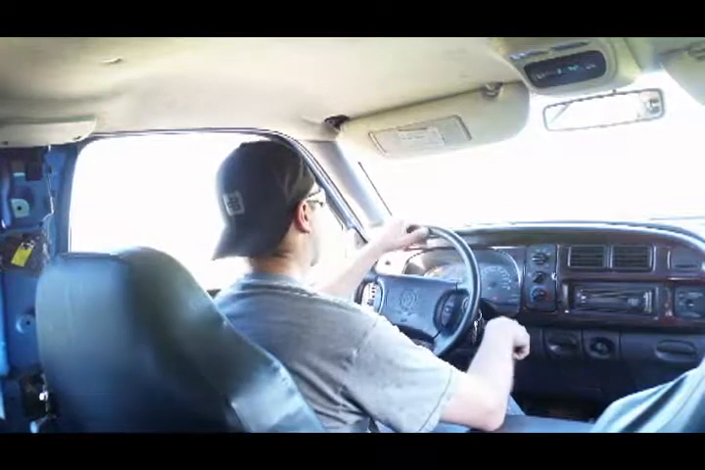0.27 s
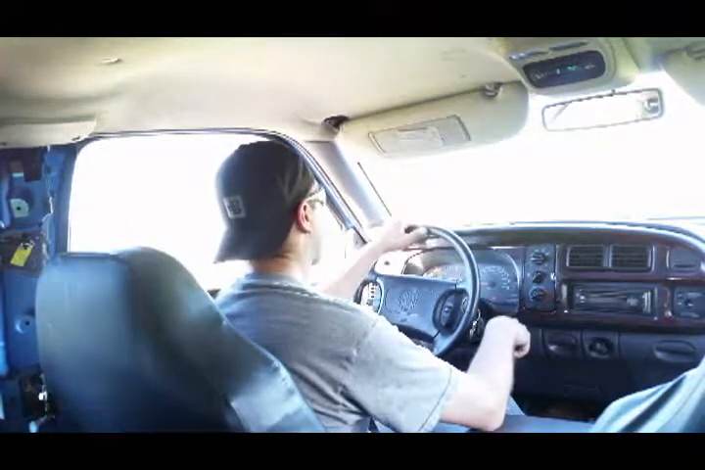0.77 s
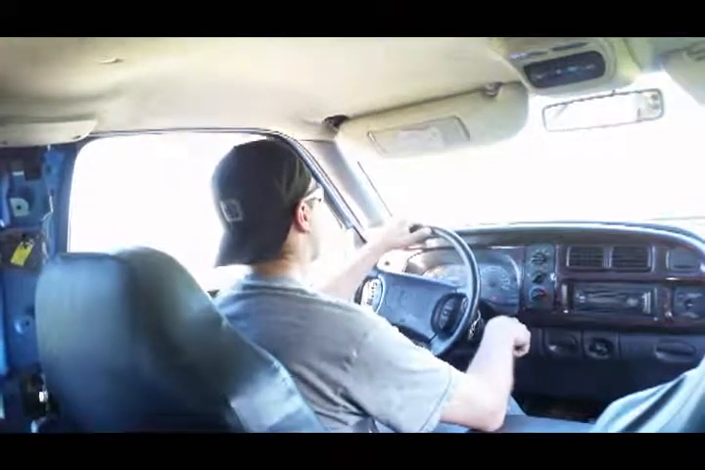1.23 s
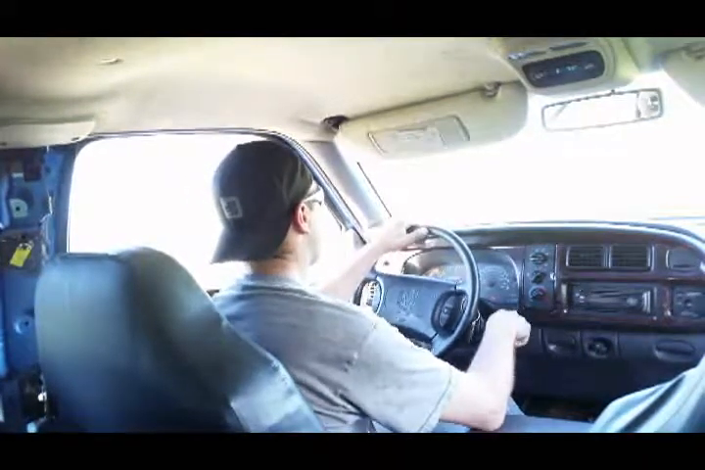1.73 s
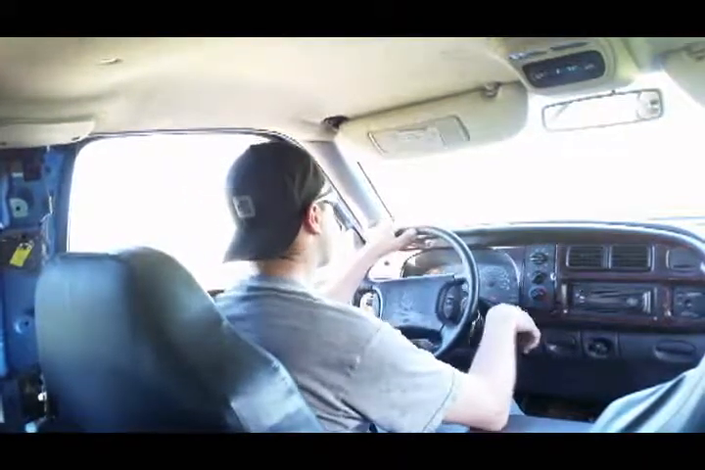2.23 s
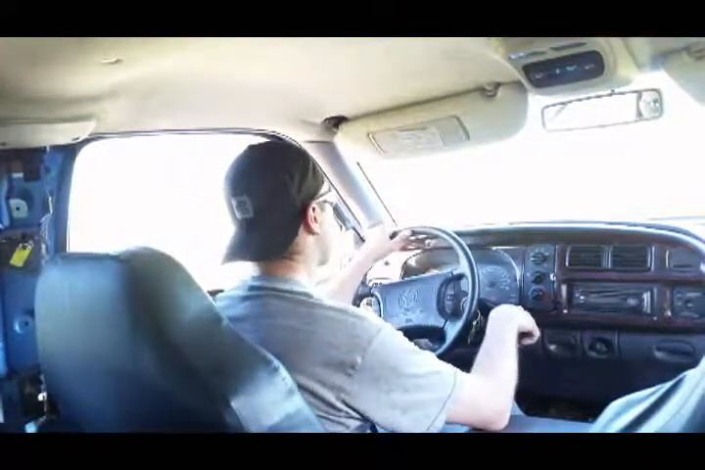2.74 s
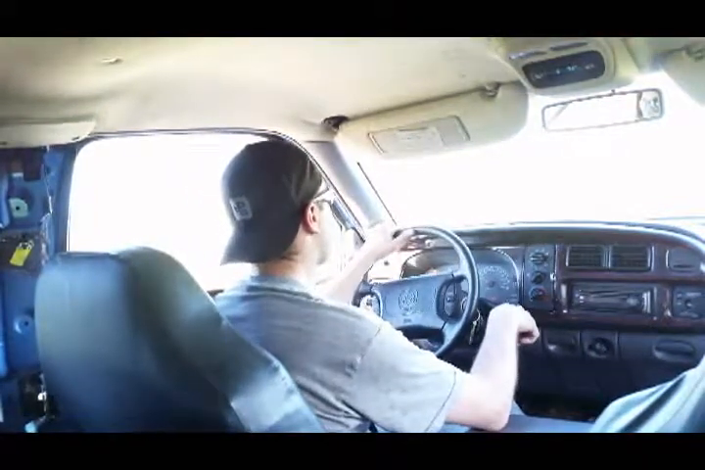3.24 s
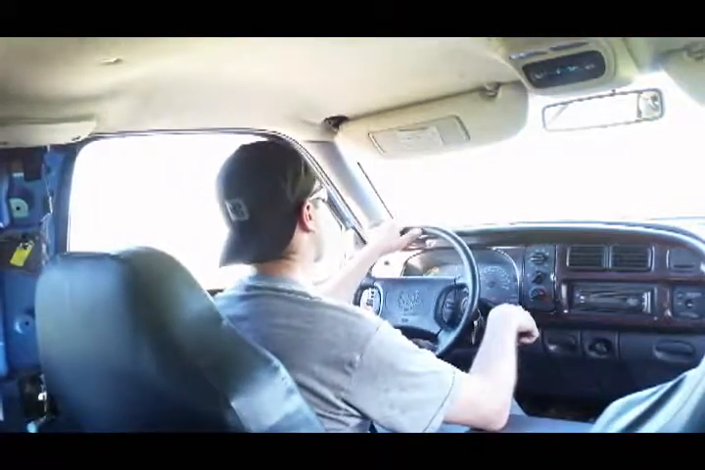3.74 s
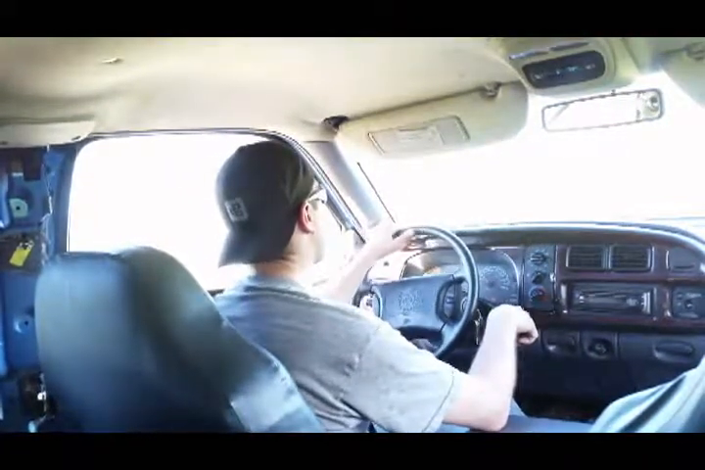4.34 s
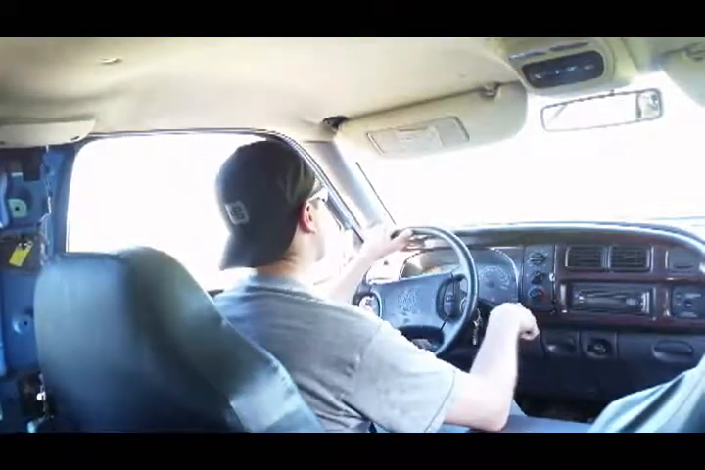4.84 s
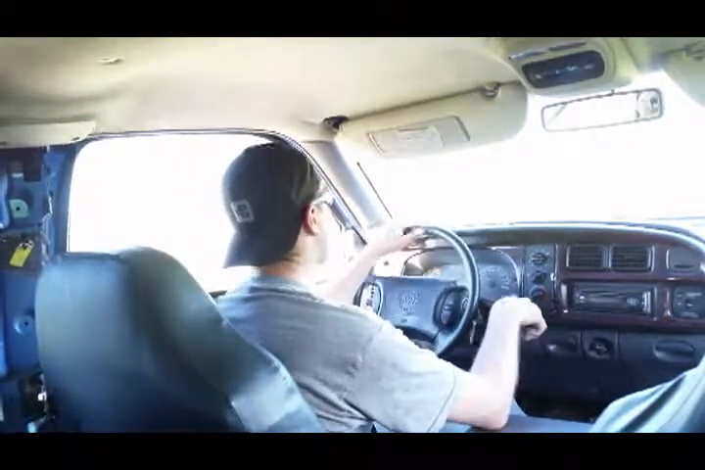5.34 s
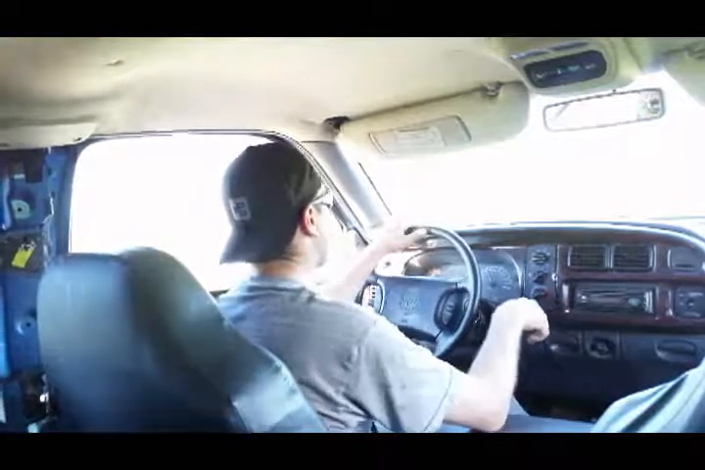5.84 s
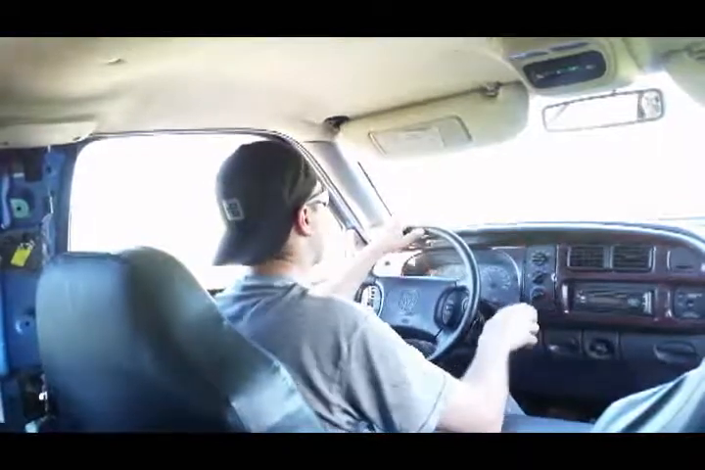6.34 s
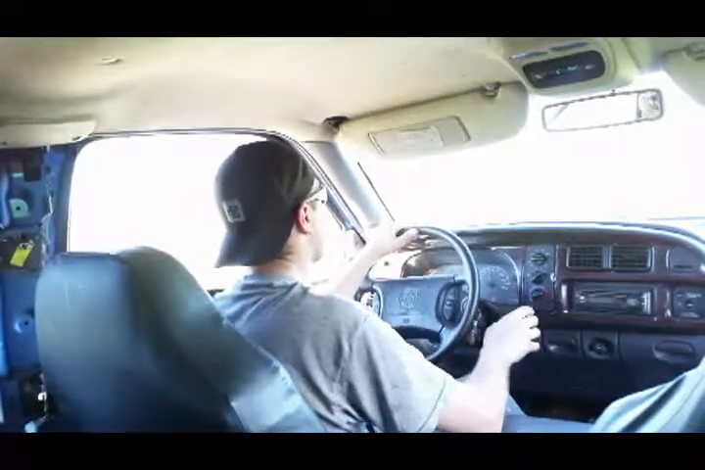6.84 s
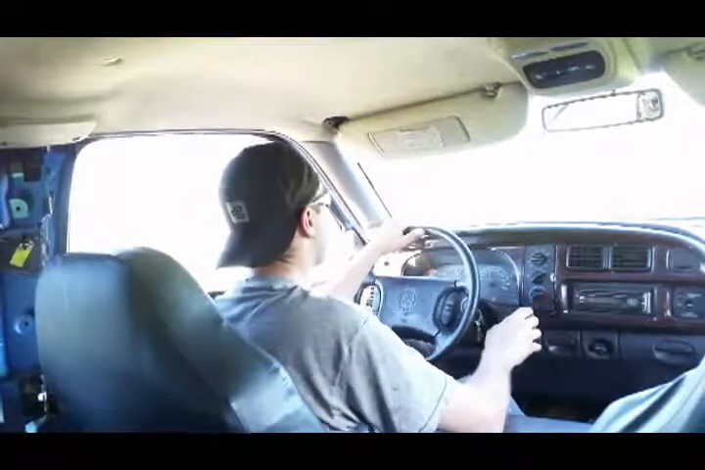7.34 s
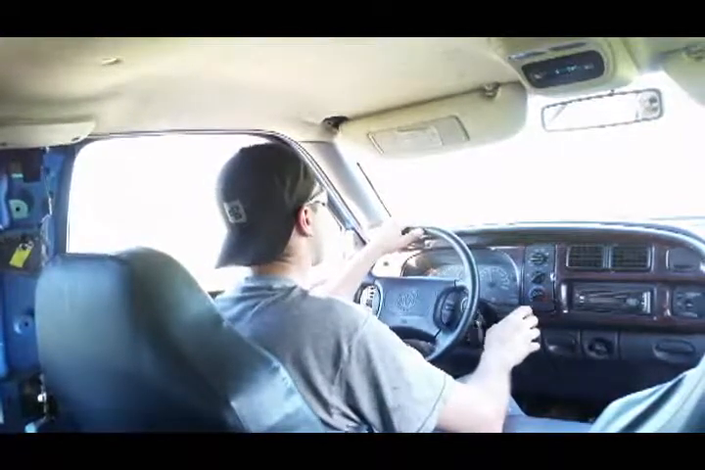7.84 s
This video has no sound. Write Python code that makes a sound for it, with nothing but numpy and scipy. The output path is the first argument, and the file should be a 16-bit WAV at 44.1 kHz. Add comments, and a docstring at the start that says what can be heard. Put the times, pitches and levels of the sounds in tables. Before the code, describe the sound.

A turbodiesel pickup engine booms through two upshifts, heard inside the cab with a thin turbo whistle and tyre rumble.

```python
"""A deep exhaust boom fills the cab of a six-cylinder turbodiesel pickup pulling hard through two
upshifts, heard from inside on a pair of microphones behind the seats. Even firings make the boom,
which dips as fuel is cut for each shift and surges as the gear catches. Unequal cylinders shake the
body and growl, and the turbocharger whistles. Close around the microphones the panels buzz;
underneath are the rumble of the tyres and a hiss of intake air and wind."""
import sys
import numpy as np
from scipy import signal
from scipy.fft import rfft, irfft, next_fast_len
from scipy.io import wavfile

SR = 44100
rng = np.random.default_rng(int(sys.argv[2]) if len(sys.argv) > 2 else 0)


def generate_wav(signal):
    """Clip the signal to [-1, 1] and save it as 16-bit WAV at the path in sys.argv[1]."""
    frames = np.transpose(np.atleast_2d(signal))
    scaled = np.clip(frames, -1, 1) * 32767
    pcm = np.round(scaled).astype(np.int16)
    wavfile.write(sys.argv[1], SR, pcm)


N = 357210

# The engine's pull. Each row: time in seconds, four-stroke cycles per second, then relative levels
# in dB of the firing tone's octave, the shake and the growl.
ENGINE_RUN = [(0.0, 19.1, 0, 7, 4), (0.18, 20.9, 0, 1, -0.5), (0.36, 22.6, 2.5, 6.5, -2),
              (0.63, 24, 0.5, 1, 2.5), (1.04, 24.5, -4, 0.5, 1), (1.53, 24.2, -4, 3.5, 1.5),
              (2.08, 25.3, 0.5, 1, 2), (2.3, 22.95, 1.5, 0.5, -1.5), (3.88, 24.28, 2.5, 1.5, 2.5),
              (5.21, 25.7, 0.5, 3.5, 1.5), (5.35, 27, -1, 2.5, 2), (5.6, 25.5, -0.5, 2, 0),
              (5.86, 23.2, 3.5, 4, 0), (6.0, 20.7, -2, 1.5, -2), (6.17, 18.3, -2, -4, -1),
              (6.9, 19.8, -1, 3, 3.5), (7.56, 20.76, 1, -3, -2), (8.1, 21.8, 3, 2, 0.5)]
# From the tailpipe to the microphones. Each row: frequency in Hz, left and right gain in dB,
# phase lead of the left in radians.
TAILPIPE_TO_MICS = [(113.5, -11.5, -19, 1), (116.4, -24.5, -6.5, 1.6), (120.5, -11.5, -11, 1.7),
                    (124.2, -6.5, -11, 0.24), (128.3, -8.5, -15, -1.35), (130, -10, -7, -0.5),
                    (139.1, -9, -11.5, 0), (144.94, -9, -16.5, 1), (147.94, -14, -17, 3.0),
                    (153, -14, -27.5, 4), (156, -17.5, -18, 2.0), (221, -17.5, -42.5, 2),
                    (234.4, -20.5, -20, 7.5), (239.5, -19.5, -21, 7), (272.7, -15.5, -23, 7),
                    (278.8, -22, -25, 6.5), (283.4, -20.5, -22, 7), (307.5, -19, -22, 7.0),
                    (323, -16.5, -19, 9.5)]
# Fuel cuts. Each row: start and end in seconds, change in dB of the firing tone and of its octave.
UPSHIFTS = [(2.085, 2.247, -11, -1.5), (5.29, 5.683, 0.5, -3)]
# Unequal cylinders. Each entry: relative level in dB of the line at 2, 3, 4 .. times the cycle rate.
BLOCK_ORDERS_DB = [2.5, 7, 5.5, 5, -12.5, 4, 1.5, 8, -2, -6, -17, -5, 4, -4.5, -1.5, -9, 4.5, -7.5, 0.5, -9,
                   -1.5, -7.5, -2.5, -8, 1, -9, 0.5, -10, 5, -7, 5, -5.5, 2.5, -0.5, 2, -3.5, 10, -1.5, 3.5,
                   -4, -0.5, -8.5, 5.5, -1]
# Through mounts and panels to the microphones. Each row: frequency in Hz, left and right gain in dB,
# phase lead of the left in radians.
BODY_TO_MICS = [(45.0, -36, -37.5, 0.7), (62.3, -41, -36, 1.6), (75.6, -29.5, -27, 0.4),
                (98, -40, -37, 0.5), (113.7, -30, -29, 2.6), (127, -24, -21, 1.98),
                (150.0, -32.5, -25.5, 2), (165, -31.5, -45, -2.3), (178, -33.5, -37, -1.2),
                (204, -36, -37, -1.6), (256, -36, -34.5, -0.65), (271, -32.5, -29.5, 0.1),
                (325, -43, -39, 1.2), (338, -34, -37, 1), (382, -38.5, -38.5, 1.1), (420, -42, -41.5, -0.8),
                (482, -39, -36, -1.5), (515, -46, -42.5, -0.6), (540, -42, -38.5, -0.6),
                (564, -49.5, -42, -0.4), (603, -41.5, -47, 1), (638, -47, -45, 1.6), (685, -48, -48, 1.5),
                (738, -53, -47, 3.5), (752, -57, -43.5, 4.5), (822, -57, -55, 4), (866, -60, -56.5, 5.5),
                (936, -62, -63.5, 2.0), (1040, -58.5, -59.5, 2.5)]
# The turbocharger spooling up. Each row: time in seconds, shaft turns per second, then relative
# levels in dB of the whine and of its third and fourth harmonics together.
TURBO_RUN = [(0, 1890, -57, -55), (.12, 2050, -54, -51), (.27, 2270, -55.5, -70), (.45, 2450, -70, -79),
             (1.1, 2450, -66, -78), (1.25, 2460, -56, -76), (1.9, 2400, -55, -70), (2.1, 2310, -53, -67),
             (2.3, 2310, -55, -66), (2.6, 2450, -60.5, -75), (3.4, 2550, -58, -74), (4.4, 2610, -57, -68),
             (5.0, 2585, -61, -70), (6.0, 2620, -60, -70), (6.6, 2745, -60, -64), (7.2, 2805, -57, -66),
             (7.5, 2815, -66, -80), (8.1, 2845, -65, -71)]
# Tyre rumble as the cab colours it. Each row: frequency in Hz, relative left and right density in dB,
# likeness of the sides from -1 to 1.
TYRE_SPECTRUM = [(20, -17, -25, .9), (35, -13.5, -13, 1), (60.3, -8, -7.5, 0.91), (74, 4, 6, 0.95),
                 (97, -3.5, 0, 1), (124, -3, -0.5, 1), (163, -4, -4.5, 0.98), (205, -9.5, -12.5, 1),
                 (338, -8.5, -11.5, 0.35), (450, -19, -16.5, 0.56), (676, -23.5, -21.5, 0.37),
                 (876, -27, -28, -0.042), (1086, -34.5, -36, -0.8), (1620, -57.5, -46, -0.021)]
# Dash and door resonances. Each row: frequency and width in Hz, relative left and right level in dB,
# likeness of the sides from -1 to 1.
PANEL_MODES = [(890, 98, -1, 1, -0.33), (1126, 95, -3, -6, -0.65), (1408, 180, -4, -3, -0.18)]
# Intake and wind hiss. Each row: frequency in Hz, relative left and right density in dB.
HISS_SPECTRUM = [(900, -74, -79.5), (1700, -79, -78), (2320, -80, -74), (2900, -80, -77.5),
                 (3300, -86, -79), (4330, -87.5, -78.5), (4900, -90.5, -77), (5520, -101, -80.5),
                 (6230, -99, -95), (6660, -114, -83), (8000, -93, -84.5), (10000, -88.5, -84.5),
                 (11200, -79, -92), (11660, -79, -97), (12400, -75.5, -93), (13200, -75.5, -90.5),
                 (14700, -78.5, -85), (15800, -75.5, -79.5)]
# The background, set lower where the exhaust booms. Each row: time in seconds, relative hiss level
# in dB, tyre rumble level in dB.
BACKGROUND_LEVELS = [(0.03, -44.5, -15.5), (0.27, -54.5, -25), (0.48, -52.5, -27), (0.85, -49.5, -24.5),
                     (1.2, -51, -26.5), (2.05, -46, -19), (2.22, -47, -17), (2.4, -51, -24.5),
                     (2.7, -51, -22.5), (3.2, -51, -26), (3.96, -48, -21.5), (4.8, -48.5, -23.5),
                     (5.45, -46, -17), (5.68, -46.5, -18), (5.93, -52, -22), (6.1, -50.5, -20),
                     (6.8, -49.5, -21.5), (7.55, -53, -26), (8.05, -51, -24)]


def exhaust(cycle, octave_db, firing_db=-0.05):
    """Six even firings a cycle leave the tailpipe as two clean tones that boom in the cab."""
    firing_shift_db, octave_shift_db = fuel_cut()
    firing = from_db(firing_db + firing_shift_db + 1.46 * drift(6)) * np.sin(6 * cycle)
    octave = from_db(octave_db + octave_shift_db + 0.88 * drift(3.4)) * np.sin(12 * cycle + 1.3)
    return to_microphones(np.sqrt(2) * (firing + octave), TAILPIPE_TO_MICS)


def fuel_cut(catch_s=0.02, surge_db=2.5, settle_s=0.11):
    """Change in dB of the two exhaust tones: fuel is cut for a shift, then they overshoot and settle."""
    t = np.arange(N) / SR
    change_db = 0
    for start, end, *cut_db in UPSHIFTS:
        cut = np.clip(np.minimum(t - start, end - t) / catch_s, 0, 1)
        surge = np.clip((t - end) / catch_s + 1, 0, 1) * np.exp(-np.abs(t - end) / settle_s)
        change_db = change_db + np.outer(cut_db, cut) + surge_db * surge
    return change_db


def engine_block(cycle, shake_db, growl_db, waver_db=2.0, waver_rad=0.13):
    """No two cylinders burn alike, nor two cycles: wavering lines, the lowest a shake, the rest a growl."""
    wander = [drift(4.64) for _ in range(7)]
    lines = 0
    for k, level_db in enumerate(BLOCK_ORDERS_DB):
        order = k + 2
        phase = order * cycle + rng.uniform(0, 2 * np.pi) + waver_rad * wander[k % 7]
        layer_db = shake_db if order < 6 else growl_db   # the shake lies below the firing tone
        gain = from_db(layer_db + level_db + waver_db * wander[(3 * k + 1) % 7])
        lines = lines + gain * np.sin(phase)
    return to_microphones(np.sqrt(2) * lines, BODY_TO_MICS)


def turbocharger(blades=7, fade_db_per_hz=0.0035):
    """Faint thin shaft lines, and a blade whistle smeared wide by turbulent intake air."""
    shaft_hz, whine_db, harmonics_db = in_time(TURBO_RUN)
    shaft = phase_of(shaft_hz)
    first = smeared_line(shaft, width_hz=40, sides_db=(1, 4))
    second = smeared_line(2 * shaft, width_hz=25, sides_db=(-14, -2))
    third = smeared_line(3 * shaft, width_hz=20, sides_db=(-5, 5))
    fourth = smeared_line(4 * shaft, width_hz=25, sides_db=(-3, 5))
    whistle = smeared_line(blades * shaft, width_hz=350, sides_db=(2.5, -3))
    fourth_db = -1 + 0.02 * np.minimum(4 * shaft_hz - 9300, 0)   # grows until its pitch reaches 9300 Hz
    climb_hz = blades * (shaft_hz - shaft_hz[0])
    whistle_db = np.maximum(-25 - fade_db_per_hz * climb_hz, -42)   # fades to a floor as it climbs
    whine = from_db(whine_db + 2.8 * drift(3)) * (first + second)
    harmonics = from_db(harmonics_db) * (third + from_db(fourth_db) * fourth)
    return whine + harmonics + from_db(whistle_db) * whistle


def tyre_rumble(level_db):
    """Tyres on the road below the cab: low noise with a wavering level."""
    return from_db(level_db + 1.76 * drift(5.7)) * stereo_noise(TYRE_SPECTRUM)


def panel_buzz(hiss_db, buzz_db=-43.5, follow_share=0.27):
    """Dash and door panels buzz in resonances that each swell alone and together follow the hiss a little."""
    gain = from_db(buzz_db + follow_share * (hiss_db - hiss_db.mean()) + 1.6 * drift(6))
    buzz = 0
    for hz, width_hz, left_db, right_db, likeness in PANEL_MODES:
        r = np.exp(-np.pi * width_hz / SR)
        poles = [1, -2 * r * np.cos(2 * np.pi * hz / SR), r * r]
        mid, side = signal.lfilter([1, 0, -1], poles, rng.standard_normal((2, N)))
        swell = from_db(np.array([[left_db], [right_db]]) + 0.84 * drift(1.7))
        buzz = buzz + swell * rms_one(left_right(mid, side, likeness))
    return gain * rms_one(buzz)


def air_hiss(level_db, lift_db=12):
    """Intake air and wind: a bright, lightly fluttering hiss, unrelated at the two microphones."""
    return from_db(level_db + lift_db + 0.73 * drift(12)) * stereo_noise(HISS_SPECTRUM)


def to_microphones(source, path):
    """A mono source reaches each microphone with its own gain and phase at every frequency."""
    run_in = SR // 4
    size = next_fast_len(N + 2 * run_in)
    left_db, right_db, lead = at_bins(path, size)
    response = from_db([left_db, right_db]) * np.exp(.5j * lead * [[1], [-1]])
    steady = np.pad(source, run_in, "reflect", reflect_type="odd")   # it sounds before and after
    return irfft(rfft(steady, size) * response, size)[:, run_in:run_in + N]


def smeared_line(phase, width_hz, sides_db):
    """A tone smeared into a band of noise, with its own draw and level at each microphone."""
    r = np.exp(-np.pi * width_hz / SR)
    a, b = signal.lfilter([1], [1, -2 * r, r * r], rng.standard_normal((2, 2, N)))
    return rms_one(a * np.cos(phase) + b * np.sin(phase)) * from_db(sides_db)[:, None]


def stereo_noise(spectrum):
    """Noise of rms 1, coloured for each side; without a likeness column the sides are unrelated."""
    size = next_fast_len(N)
    left_db, right_db, *likeness = at_bins(spectrum, size)
    mid, side = rfft(rng.standard_normal((2, size)))
    pair = left_right(mid, side, likeness[0] if likeness else 0)
    return rms_one(irfft(pair * from_db([left_db, right_db]), size)[:, :N])


def left_right(mid, side, likeness):
    """Mix two unrelated noises into a pair with the given correlation."""
    likeness = np.clip(likeness, -1, 1)
    return np.sqrt(1 + likeness) * mid + np.sqrt(1 - likeness) * side * [[1], [-1]]


def drift(rate_hz):
    """Slow random wander of spread 1: noise through a double one-pole low-pass."""
    hop, run_in = 40, 2000
    r = np.exp(-2 * np.pi * rate_hz * hop / SR)
    noise = rng.standard_normal(N // hop + run_in + 2)
    slow = signal.lfilter([1], [1, -2 * r, r * r], noise)[run_in:]
    return np.interp(np.arange(N) / hop, np.arange(len(slow)), rms_one(slow))


def in_time(rows):
    """Columns of a curve table, one value per sample."""
    seconds, *columns = np.transpose(rows)
    return [np.interp(np.arange(N) / SR, seconds, c) for c in columns]


def at_bins(rows, size):
    """Columns of a spectrum table, one value per bin of an FFT of this size."""
    bin_hz = np.arange(size // 2 + 1) * SR / size
    row_hz, *columns = np.transpose(rows)
    return [np.interp(np.log(bin_hz + 1), np.log(row_hz), c) for c in columns]


def phase_of(hz):
    """Phase in radians of something that turns at a changing rate."""
    return 2 * np.pi * np.cumsum(hz) / SR


def from_db(db):
    """Decibels to gain."""
    return 10 ** (np.asarray(db) / 20)


def rms_one(x):
    """Scale to unit rms."""
    return x / np.sqrt(np.mean(x ** 2) + 1e-20)


def scene():
    """Engine, turbocharger, tyres, panels and air at the microphones behind the seats."""
    cycle_hz, octave_db, shake_db, growl_db = in_time(ENGINE_RUN)
    hiss_db, rumble_db = in_time(BACKGROUND_LEVELS)
    cycle = phase_of(cycle_hz)
    engine = exhaust(cycle, octave_db) + engine_block(cycle, shake_db, growl_db)
    background = tyre_rumble(rumble_db) + panel_buzz(hiss_db) + air_hiss(hiss_db)
    return engine + turbocharger() + background


def record(dry):
    """Peaks are rounded a little and the highest treble is cut."""
    ceiling, cutoff_hz = 1.25, 15760
    rounded = ceiling * np.tanh(dry / ceiling)
    low_pass = signal.ellip(16, .3, 80, cutoff_hz, fs=SR, output="sos")
    settled = signal.sosfilt_zi(low_pass)[:, None] * rounded[:, :1]   # no click at the start
    return signal.sosfilt(low_pass, rounded, zi=settled)[0]


dry = scene()
out = record(dry)
generate_wav(out)
```